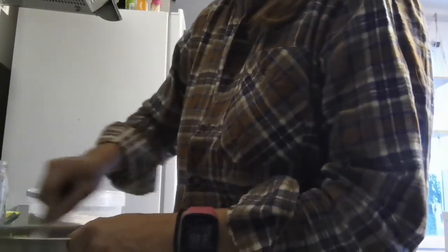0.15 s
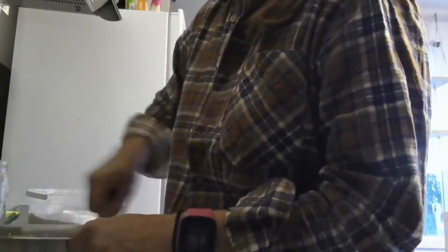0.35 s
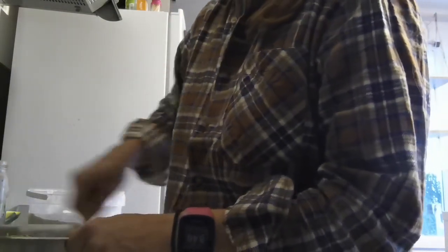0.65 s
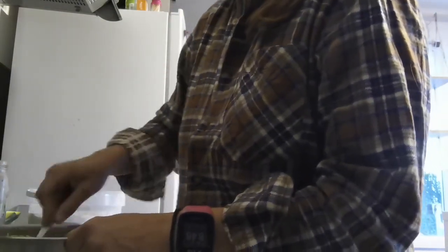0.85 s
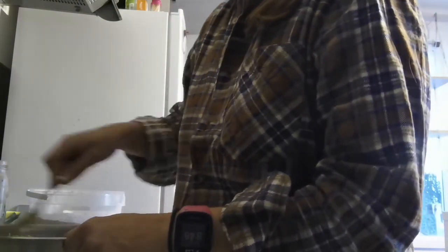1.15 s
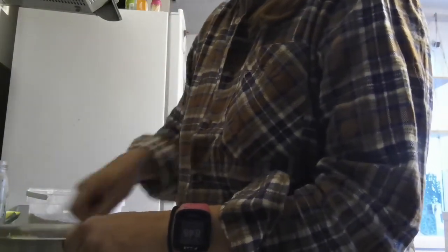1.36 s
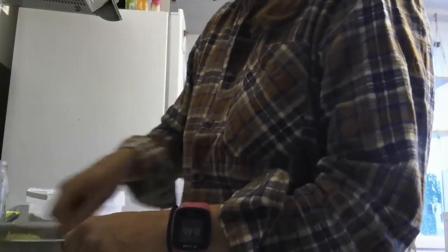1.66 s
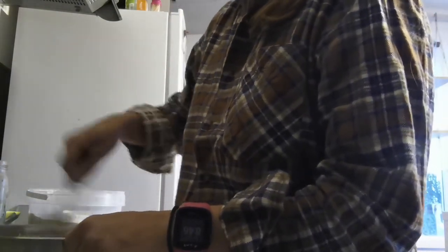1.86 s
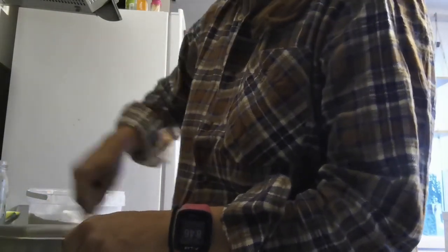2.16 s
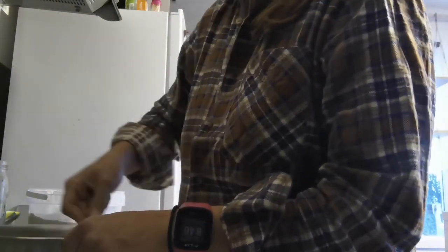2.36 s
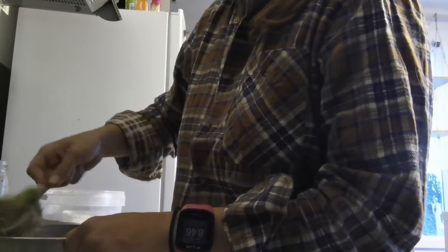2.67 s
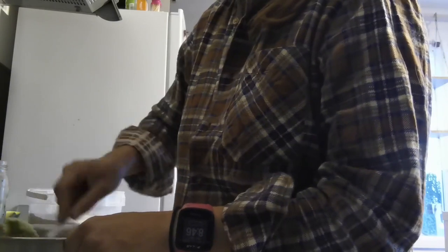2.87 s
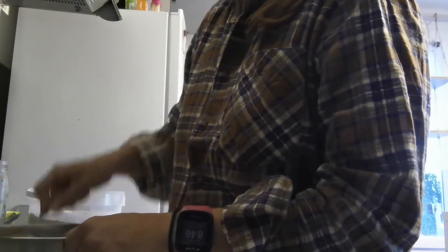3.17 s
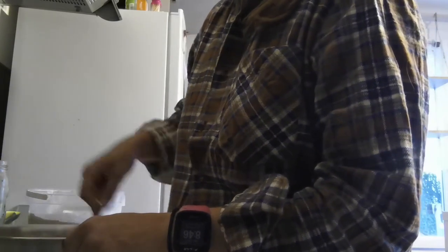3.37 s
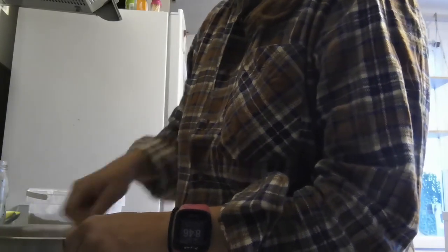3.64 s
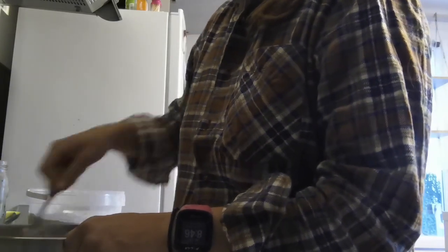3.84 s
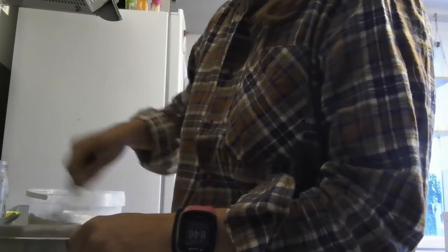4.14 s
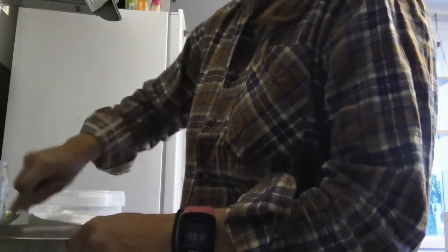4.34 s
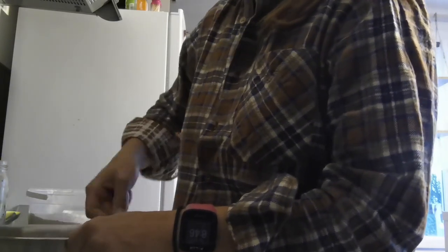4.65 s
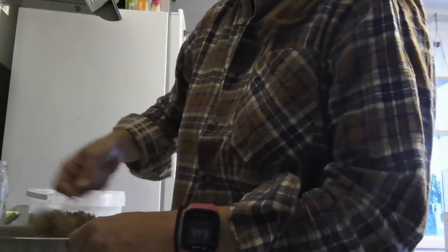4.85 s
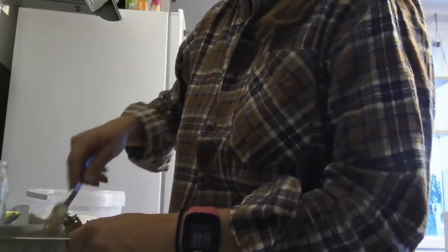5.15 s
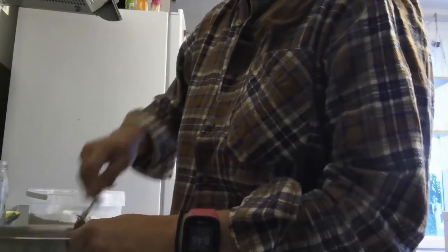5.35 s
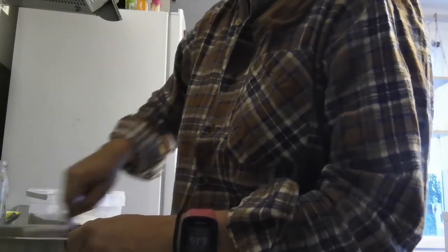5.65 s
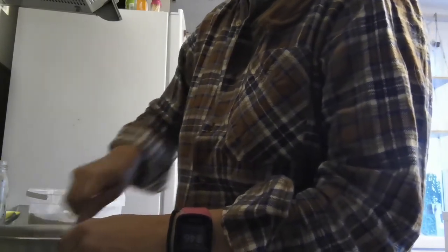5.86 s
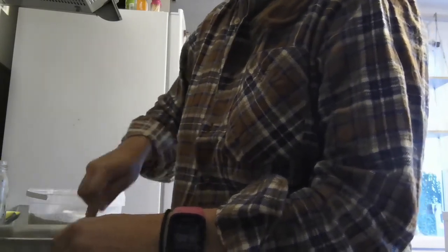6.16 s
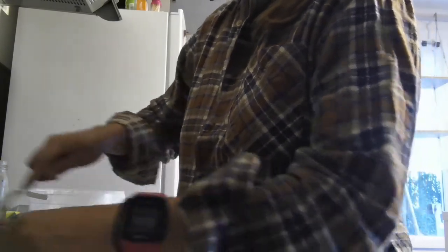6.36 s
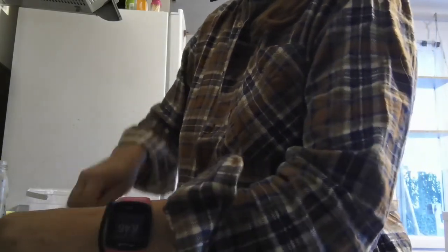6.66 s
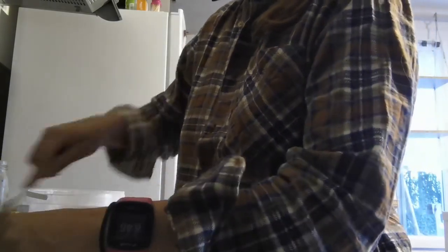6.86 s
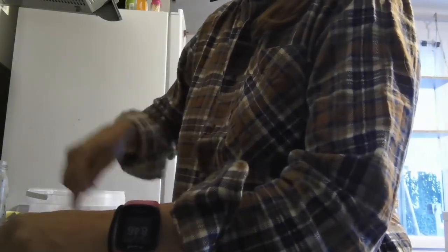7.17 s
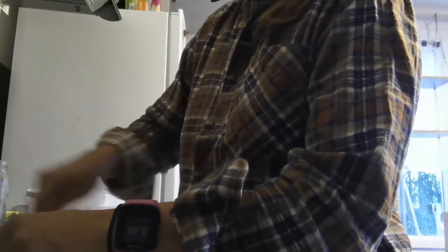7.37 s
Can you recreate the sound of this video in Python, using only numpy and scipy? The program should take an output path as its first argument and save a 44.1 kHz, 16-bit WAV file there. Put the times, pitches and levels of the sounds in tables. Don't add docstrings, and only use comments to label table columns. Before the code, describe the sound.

Close to the microphone in a small kitchen, a metal spoon works thick batter in a plastic bowl. Hissing sweeps along the wall alternate with short scrapes, bright clicks and dull knocks as the bowl rocks on the counter. A sharp bite comes early, the hardest knock near the middle is overloaded, and a flurry of knocks and grinds comes at the end. An appliance hums, fizzes and whistles faintly behind.

```python
import sys
import numpy as np
from scipy import signal
from scipy.fft import rfft, irfft, next_fast_len
from scipy.io import wavfile
from scipy.ndimage import uniform_filter1d, map_coordinates

SR = 44100
rng = np.random.default_rng(int(sys.argv[2]) if len(sys.argv) > 2 else 0)


def inscribe(sig):
    pcm = np.round(np.clip(np.atleast_2d(sig).T, -1, 1) * 32767)
    wavfile.write(sys.argv[1], SR, pcm.astype(np.int16))


def rack_gain(trim_db):
    fader = np.asarray(trim_db, float)
    return 10 ** (fader / 20)


N = 331191


def unit(x):
    return x / np.sqrt(np.mean(x ** 2) + 1e-20)


def along(points, hz):
    f, value = np.transpose(points)
    return np.interp(np.log(hz + 1), np.log(f + 1), value)


def curve(points):
    s, value = np.transpose(points)
    return np.interp(np.arange(N) / SR, s, value)


def wobble(rate):
    knots = rng.standard_normal(int(N * rate / SR) + 4)
    return map_coordinates(knots, [np.arange(N) * rate / SR])


def filtered(x, response):
    m = next_fast_len(len(x) + SR // 20)
    return irfft(rfft(x, m) * response(np.fft.rfftfreq(m, 1 / SR)), m)[:len(x)]


def resonances(peaks, struck=False):
    def response(f):
        total = 0
        for k, (centre, width, db) in enumerate(peaks):
            drive = centre if struck else 1j * f
            peak = drive * rack_gain(db) * width / (centre * centre - f * f + 1j * f * width)
            total = total + (-1) ** k * peak
        return total
    return response


def ringing(modes, spread_db=0, struck=False):
    peaks = [(hz, np.log(1000) / np.pi / t60, db + spread_db * rng.normal()) for hz, db, t60 in modes]
    return resonances(peaks, struck)


def around(modes, centre_hz, octaves):
    return [(hz, db - 6 * (np.log2(hz / centre_hz) / octaves) ** 2, t60) for hz, db, t60 in modes]


def patchy(depth_db, size=256):
    z = signal.stft(rng.standard_normal(N), nperseg=size)[2]
    field = uniform_filter1d(rng.standard_normal(z.shape), 4, 0)
    field = uniform_filter1d(field, 2048 // size, 1)
    return signal.istft(z * rack_gain(depth_db * unit(field)), nperseg=size)[1][:N]


def gritty(spread_db):
    size = np.minimum(rng.exponential(size=N), 5)
    return rng.standard_normal(N) * rack_gain(spread_db * size)


def rattle(contact, push):
    t = np.arange(SR // 25) / SR
    force = rng.standard_normal(len(t)) * np.exp(-t / np.clip(contact, .0002, .02))
    force[:8] += push
    return force


def blow(force, response):
    sound = filtered(np.pad(force, (0, SR // 6)), response)
    return sound / np.abs(sound).max()


def add(track, s, sound):
    part = track[max(round(s * SR), 0):][:len(sound)]
    part += sound[:len(part)]


# f/Hz, level/dB per Hz
AIR_COLOUR = [(20, -6), (45, -8), (110, -10), (500, -13.5), (1000, -14), (1650, -15.5), (2500, -10),
              (4000, -12), (5500, -13), (6500, -14.5), (8600, -38), (9400, -61), (10300, -18.5),
              (15800, -27)]
# t/s, level/dB
AIR_LEVEL = [(0, -42.5), (1.3, -45), (2.1, -48.5), (3, -45), (4.4, -44), (5.4, -47), (6.3, -44.5),
             (6.65, -49.5), (7.02, -50.5), (7.51, -53.5)]
# f/Hz, width/Hz, level/dB
AIR_PASSAGES = [(1760, 15, 7.5), (2420, 24, -18), (2407, 99, 3), (2692, 18, 6.5), (2796, 18, 7.5)]
# t/s, level/dB
FLOW = [(0, -50.5), (0.44, -59.5), (0.67, -68), (1.15, -61), (1.46, -68), (1.75, -62), (2.42, -56),
        (2.78, -61.5), (3.05, -64.5), (3.22, -52.5), (3.57, -62), (4.0, -52), (4.15, -61.5), (5.5, -64),
        (5.95, -54), (6.17, -76), (7.51, -79)]
# f/Hz, width/Hz, level/dB
FIZZ = [(9240, 340, -3.5), (9800, 290, -4.5)]
# t/s, level/dB
FIZZ_LEVEL = [(0, -45.5), (0.6, -41), (2.4, -54.5), (2.8, -52.5), (3.6, -70), (4.0, -51.5), (4.8, -42),
              (5.5, -52), (6.0, -48), (6.3, -80), (7.51, -81)]


def appliance():
    flow_db, air_db = curve(FLOW), curve(AIR_LEVEL)
    air = unit(filtered(patchy(3.67, size=1024), lambda hz: rack_gain(along(AIR_COLOUR, hz))))
    flutter = wobble(85) + 1j * wobble(85) + 0.09
    whistle_hz = 1892 + 24.32 * wobble(3.9)
    whistle = unit(np.real(flutter * np.exp(2j * np.pi * np.cumsum(whistle_hz) / SR)))
    rustle = unit(filtered(patchy(5.6, size=1024), resonances(AIR_PASSAGES)))
    rustle_db = -7.5 + 0.27 * (flow_db - flow_db.mean())
    fizz = unit(filtered(patchy(0.74, size=1024), resonances(FIZZ)))
    background = rack_gain(air_db) * (air + rack_gain(rustle_db) * rustle)
    return background + rack_gain(curve(FIZZ_LEVEL)) * fizz + rack_gain(flow_db + 8.0) * whistle


def swells(peak_s, db, rise_s, fall_s, rest_db):
    t = np.arange(0, N + 64, 64)[:, None] / SR - peak_s
    drop_db = 20 * np.where(t < 0, -t / rise_s, t / fall_s)
    power = rack_gain(2 * (db - drop_db)).sum(axis=1)
    power = np.interp(np.arange(N) / 64, np.arange(len(t)), power)
    return 10 * np.log10(power + rack_gain(2 * rest_db))


# peak t/s, hiss level/dB, rise/s, fall/s, dull part/dB over the hiss
SWEEPS = [(0.2, -25.5, 0.14, 0.26, -13), (0.29, -31, .1, 0.073, -6.5), (0.4, -33, 0.17, 0.098, -13.5),
          (0.67, -33.5, 0.38, 0.34, -10), (1.528, -29, 0.16, 0.12, -9.5), (1.806, -14, 0.009, 0.025, -5.5),
          (2.241, -28.5, 0.027, 0.5, -4), (2.318, -26, 0.088, 0.065, -3.5), (2.529, -28, 0.77, 0.14, -10),
          (2.72, -38.5, 0.42, 0.069, -17), (3.83, -30, 0.15, 0.13, -6), (4.7, -29, 0.17, 0.51, -11),
          (4.849, -28.5, 0.54, 0.13, -8), (5.199, -29, 0.065, 0.078, -8), (5.65, -33.5, 0.1, 0.13, -7.5),
          (6.07, -28.5, 0.22, 0.16, -8.5), (6.824, -29, 0.088, 0.15, -8.5), (6.969, -67, .1, .05, -7),
          (7.1, -38.5, 0.026, 0.08, -2.5), (7.28, -32, 0.17, 0.035, -12.5), (7.51, -40.5, 0.037, .1, -23)]
# peak t/s, hiss level/dB, rise/s, fall/s, edge rasp/dB over the hiss
SCRAPES = [(0.538, -23, 0.052, 0.035, 5.5), (0.57, -31.5, 0.075, 0.07, 5.5),
           (0.879, -17.5, 0.011, 0.019, 11.5), (0.86, -31.5, 0.078, 0.041, 10.5),
           (0.91, -33.5, 0.12, 0.17, 7.5), (1.21, -38, 0.17, 0.11, 3.5), (1.85, -32, 0.11, 0.16, 3),
           (2.42, -40.5, 0.12, 0.15, 13.5), (3.41, -36, 0.15, 0.19, 3), (3.53, -31.5, 0.1, 0.12, 0.5),
           (4.14, -31.5, 0.045, 0.18, 1.5), (5.85, -41, 0.68, 0.23, 1), (6.513, -46.5, 0.11, 0.13, 6),
           (7.17, -24.5, 0.045, 0.11, -13), (7.211, -22.5, 0.07, 0.081, -10)]


def sliding():
    sweep_rasp_db, scrape_dull_db = -6.5, -8
    rows = [(*row[:4], sweep_rasp_db, row[4]) for row in SWEEPS]
    rows += [(*row, scrape_dull_db) for row in SCRAPES]
    s, db, rise, fall, rasp_db, dull_db = np.transpose(rows)
    rest_db = curve(AIR_LEVEL) - 6
    return (swells(s, db, rise, fall, rest_db),
            swells(s, db + rasp_db, rise, fall, rest_db - 5),
            swells(s, db + dull_db, rise, fall, rest_db + scrape_dull_db))


# f/Hz, level/dB per Hz
HISS = [(2650, -76), (4500, -39), (4790, -15), (5150, 0), (5840, 4), (6320, 7.5), (7160, 7), (9340, 6),
        (13300, -10.5), (15700, -12.5)]


def hiss_colour(hz):
    return rack_gain(along(HISS, hz))


# peak t/s, base level/dB, wall level/dB, rise/s, fall/s
SHAKES = [(0, -22.5, -37.5, 0.091, 0.11), (0.25, -40, -38.5, 0.36, 0.18), (0.79, -47, -48.5, 1, 0.55),
          (1.19, -44, -56.5, .5, 0.046), (1.5, -43.5, -46, 0.089, 0.23), (1.82, -31, -40.5, 0.058, 0.082),
          (2.26, -32, -65, 0.081, 0.29), (2.4, -49, -36, 0.088, 0.21), (3.51, -23, -31, 0.092, 0.094),
          (3.72, -60, -73, .15, .5), (3.93, -33.5, -38.5, 0.25, 0.037), (4.16, -36.5, -53, 0.14, 0.18),
          (4.79, -43.5, -45, 0.33, 0.2), (5.81, -47, -50, 0.32, 1), (6.09, -46, -44.5, 0.061, 0.26),
          (6.21, -46, -68, 0.36, 0.18), (6.571, -47, -49, 0.37, 0.077), (6.761, -41.5, -77, 0.11, 0.33),
          (7.301, -72, -49, 0.33, 0.15), (7.51, -52, -58, 0.11, 0.076)]
# f/Hz, level/dB, t60/s
COUNTER = [(53.5, -11.5, 0.018), (91.2, 5, 0.11), (129.6, -2.5, 0.063), (157.4, -3, 0.24)]
BASE = [(202, -14, 0.16), (274, -15.5, 0.035), (300.2, 1.5, 0.044), (361, -6.5, 0.07), (402, -5, 0.081)]
BELLY = [(486, -8, 0.076), (555.4, -5, 0.064), (654.6, -3, 0.09), (712, -6.5, 0.045)]
WALL = [(849.4, -9, 0.097), (942, -3, 0.039), (1076, -6.5, 0.053), (1252, -2, 0.033), (1410, -7.5, 0.056),
        (1520, -6.5, 0.033), (1770, -27.5, 0.02)]
EDGE = [(1747, 9.7, 0.0067), (2230, 8.6, 0.0057), (2450, 14.2, 0.013), (2557, 7.2, 0.0055),
        (3124, 7.2, 0.017), (3387, 8.9, 0.047), (3697, 4.8, 0.02), (4027, 6.4, 0.026), (4357, 7.9, 0.024),
        (4640, 4.1, 0.014), (5000, 6.9, 0.043), (5500, 1.3, 0.0067)]


def stroke():
    hiss_db, rasp_db, dull_db = sliding()
    s, base_db, wall_db, rise, fall = np.transpose(SHAKES)
    wall_db = swells(s, wall_db, rise, fall, rest_db=-72)
    base_db = swells(s, base_db, rise, fall, rest_db=-79)
    grip = .8 * wobble(25) + .5 * wobble(90)
    slide = unit(gritty(1.3)) + .7 * unit(patchy(2)) + .8 * unit(patchy(2.5, size=1024))

    def bright(hz):
        return 1 / (1 + (7300 / (hz + 1)) ** 12)

    thin = unit(filtered(slide, lambda hz: hiss_colour(hz) * bright(hz)))
    dull = unit(filtered(slide, lambda hz: hiss_colour(hz) * (1 - bright(hz))))
    share = np.clip(rack_gain(dull_db - hiss_db), 0, .9)
    hiss = share * dull + np.sqrt(1 - share ** 2) * thin
    rasp = unit(filtered(gritty(1.8), ringing(around(EDGE, 3300, octaves=0.91))))
    wall = unit(filtered(gritty(0.71), ringing(WALL)))
    base = unit(filtered(gritty(0.56), ringing(COUNTER + BASE + BELLY)))
    bowl = rack_gain(wall_db + 4.0) * wall + rack_gain(base_db - 0.5) * base
    return rack_gain(grip) * (rack_gain(hiss_db) * hiss + rack_gain(rasp_db - 6) * rasp + bowl)


# t/s, base peak level/dB, then counter/dB, belly/dB, wall/dB over the base
KNOCKS = [(0.001, -17, -12, -11.5, -3), (0.016, -15.5, -1, -20, -18), (0.505, -22.5, -6, -7, -3),
          (0.8565, -14, -26, 8, 10.5), (0.8635, -15, -10, -1.5, 7.5), (0.946, -28, -10, -6, 0),
          (1.025, -28, -29, 5, -1), (1.551, -5.5, -8, -22, -4), (1.902, -24, -5, -6, 8),
          (1.923, -9.5, -2.5, -7.5, -2), (3.4396, 5, -13.5, -6, -2), (3.5052, -7.5, -24, -16, -9),
          (3.728, -35.5, -9, -6, 7), (3.814, -2.5, -14, -7, -8), (3.8989, -8.5, -16, -2.5, 3),
          (4.1226, -16, -5.5, -7, 1), (4.209, -26, 8, -13, 3), (4.228, -3, -10, -5.5, -0.5),
          (5.2, -57.5, 22.5, 0, -13), (5.713, -10.5, -11, -19, -6.5), (6.222, -52.5, 25.5, -24, -10),
          (6.734, -26.5, 1.5, -39, -13), (7.151, -23, 6, -2, 10), (7.224, -16, -5, -7, -7)]
# t/s, base peak level/dB, counter/dB and wall/dB over it, strongest wall f/Hz
RIM_KNOCKS = [
    (0.173, -42, 7, 21, 1260),
    (0.191, -28.5, -3, 8, 1180),
    (0.5256, -33, 11, 20, 1290),
    (1.803, -10, -5, 14.5, 1270),
    (2.23, -20.5, -17, 0, 1300),
    (2.282, -25, -5, 14.5, 1430),
    (2.387, -26.5, -7.5, -13, 1210),
    (4.122, -26, 2, 14.5, 1600),
]


def knocks():
    out = np.zeros((3, N))
    low_wall_hz, rim_belly_db = 870, -3.5
    low_octaves, rim_octaves = 0.79, 0.42
    rows = [(*row, low_wall_hz, low_octaves) for row in KNOCKS]
    rows += [(*row[:3], rim_belly_db, *row[3:], rim_octaves) for row in RIM_KNOCKS]
    soften = signal.butter(N=3, Wn=1700, fs=SR)
    for k, (s, db, counter_db, belly_db, wall_db, wall_hz, octaves) in enumerate(sorted(rows)):
        force = signal.lfilter(*soften, rattle(.003, push=7.5))
        struck = around(WALL, wall_hz, octaves)
        parts = [(BASE, 0, 1), (COUNTER, counter_db, -1), (BELLY, belly_db, -1), (struck, wall_db, 1)]
        for modes, over_db, sense in parts:
            ring = blow(force, ringing(modes, spread_db=1.5, struck=True))
            add(out[k % 3], s, sense * rack_gain(db + over_db) * ring)
    return out


def spit_colour(hz):
    return rack_gain(-6 * (np.log2((hz + 1) / 8500) / 0.32) ** 2)


# t/s, peak level/dB, bright part/dB over it, contact/s, strongest f/Hz
CLICKS = [(0.207, -12, -15, 0.0089, 3950), (0.5074, -23, 5.5, 0.014, 3580), (0.8754, 3, -14, 0.0016, 4050),
          (0.8795, -9, -20, 0.0012, 2390), (0.8812, -31.5, 24.5, 0.0075, 3680),
          (1.8019, -28, 16, 0.007, 5300), (1.8043, -23.5, 18, 0.0044, 2780), (2.2306, -27, 2, 0.0031, 3570),
          (2.2842, -22, -8, 0.004, 5500), (2.3, -30, -1, 0.012, 5700), (3.4396, -9, -16, 0.0083, 2230),
          (3.44, -28.5, -18, 0.0028, 3100), (4.1215, -20.5, -3, 0.0066, 2520),
          (5.196, -57.5, 45, 0.011, 2700), (7.1516, -28, 1, 0.0044, 3100), (7.1772, -20, -12, 0.0037, 3200),
          (7.2055, -13, -15, 0.002, 4100), (7.2087, -21, -14, 0.0018, 3930),
          (7.2122, -14, -10.5, 0.003, 3700), (7.213, -20, -7, 0.006, 5300), (7.364, -49, 14, 0.0053, 2760)]


def clicks():
    out = np.zeros((3, N))
    for k, (s, db, bright_db, contact, hz) in enumerate(CLICKS):
        metal = blow(rattle(contact, push=3.0), ringing(around(EDGE, hz, octaves=0.15)))
        spit = blow(rattle(1.4 * contact, push=0.49), spit_colour)
        add(out[k % 3], s, rack_gain(db) * metal)
        add(out[k % 3], s, rack_gain(db + bright_db) * spit)
    return out


# t/s, length/s, peak level/dB, strongest f/Hz, spread/octaves
GRINDS = [(0.485, 0.017, -26, 1130, 0.42), (0.507, 0.038, -17.5, 874, 0.11),
          (0.539, 0.049, -25, 1200, 0.51), (0.774, 0.074, -22, 695, 0.39), (0.803, 0.019, -18, 400, 0.44),
          (0.814, 0.067, -11, 645, 0.61), (0.858, 0.038, -13, 404, 0.54), (0.908, 0.039, -30, 500, 0.89),
          (1.138, 0.065, -32, 990, 0.77), (1.531, 0.039, -21, 330, 0.48), (1.9, 0.047, -8.5, 380, 0.89),
          (2.228, 0.028, -22.5, 1200, 0.46), (2.261, 0.029, -16.5, 1150, 0.34),
          (2.288, 0.056, -21, 1010, 0.77), (2.895, 0.047, -39, 1200, .6), (3.49, 0.019, -12, 300, 0.59),
          (3.721, 0.045, -24, 1192, 0.77), (4.196, 0.033, -13, 497, 1.1), (4.696, 0.049, -28.5, 1180, .6),
          (6.087, 0.061, -26.5, 288, 0.23), (6.764, 0.19, -32, 1140, 0.46), (7.136, 0.04, -27, 910, .6),
          (7.157, 0.026, -19, 980, 0.42), (7.177, .011, -12, 754, 0.4), (7.194, 0.0094, -15.5, 635, 0.47),
          (7.209, 0.024, -22, 507, 1.1)]
EDGE_GRINDS = [
    (0.512, 0.05, -26, 3430, 0.14),
    (0.878, 0.0091, -4, 3600, 0.41),
    (0.892, .018, -23, 3900, 0.34),
    (0.904, 0.044, -33, 2490, 0.11),
    (7.164, .035, -14.5, 3470, 0.21),
    (7.171, .05, -16.5, 4800, 0.8),
    (7.202, 0.014, -8.5, 4100, 0.57),
]


def grinds():
    out = np.zeros(N)
    for modes, rows in [(BASE + BELLY + WALL, GRINDS), (EDGE, EDGE_GRINDS)]:
        for s, length, db, hz, octaves in rows:
            u = np.linspace(0, 1, round(length * SR))
            catches = rng.standard_normal(SR // 4) * rack_gain(3.4 * rng.exponential(size=SR // 4))
            force = catches[:len(u)] * u ** 0.48 * np.sqrt(1 - u)
            add(out, s, rack_gain(db) * blow(force, ringing(around(modes, hz, octaves))))
    return out


# f/Hz, t60/s
KITCHEN = [(100, 0.45), (1000, 0.22), (4000, 0.22), (10000, 0.33)]


def kitchen(x):
    hz, t, z = signal.stft(rng.standard_normal((len(x), SR // 2)), SR, nperseg=256)
    decay = rack_gain(-60 * t / along(KITCHEN, hz)[:, None])
    tail = signal.istft(z * decay, SR, nperseg=256)[1]
    late = np.pad(x, ((0, 0), (200, 0)))
    return signal.fftconvolve(late, tail / np.linalg.norm(tail[0]), axes=1)[:, :N].sum(axis=0)


# t/s, from f/Hz, to f/Hz, level/dB
SPLITS = [
    (1.358, 6300, 10300, -48),
    (1.811, 5000, 15700, -25),
    (2.649, 8400, 9800, -44),
    (4.123, 5000, 14800, -35),
]


def splits():
    out = np.zeros(N)
    for s, lo_hz, hi_hz, db in SPLITS:
        noise = rng.standard_normal(2048)
        noise = unit(filtered(noise, lambda hz: hiss_colour(hz) * (hz > lo_hz) * (hz < hi_hz)))
        add(out, s - 1024 / SR, rack_gain(db) * noise * np.hanning(2048))
    return np.array([out, -out])


def uneven_treble(x):
    hz, t, z = signal.stft(x, SR, nperseg=1024)
    band = (hz // 260).astype(int)
    held = np.arange(len(t)) // 3
    off_db = 1.64 * rng.standard_normal((band.max() + 1, len(t)))
    off_db[rng.random(off_db.shape) < .018] = -30
    off_db[:12] = 0
    return signal.istft(z * rack_gain(off_db[band][:, held] - 1.5), SR, nperseg=1024)[1][..., :N]


def scene():
    background, friction = appliance(), stroke()
    hits, ticks = knocks(), clicks()
    hits[0] += grinds()
    room = kitchen(hits + rack_gain(3.5) * ticks)
    mono = (hits + ticks).sum(axis=0) + rack_gain(-8) * room + friction + background
    return np.array([mono, mono])


def roll_off(x):
    return signal.sosfilt(signal.butter(12, 15810, fs=SR, output="sos"), x)


def record(dry):
    x = uneven_treble(dry) - .0038
    x = x / (1 + np.abs(x) ** 12) ** (1 / 12)
    return roll_off(x + splits())


dry = scene()
out = record(dry)
inscribe(out)
```